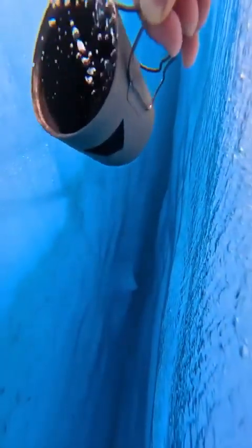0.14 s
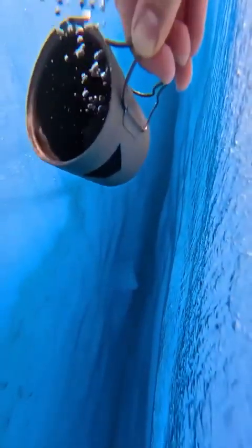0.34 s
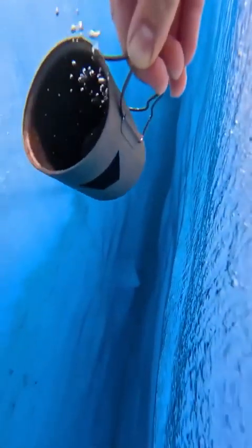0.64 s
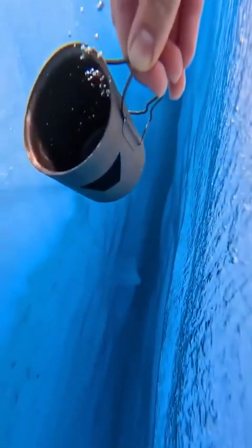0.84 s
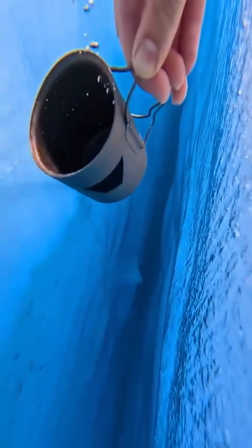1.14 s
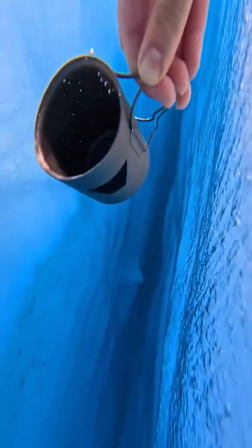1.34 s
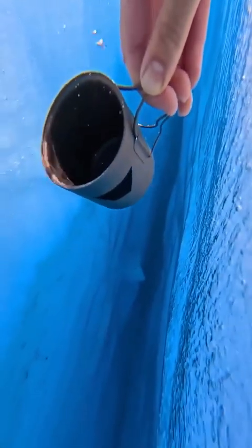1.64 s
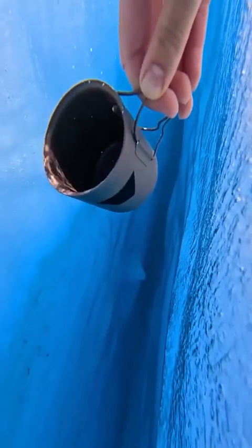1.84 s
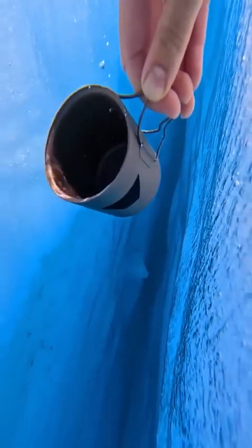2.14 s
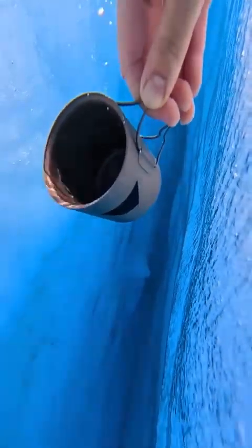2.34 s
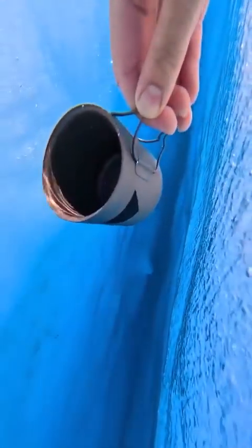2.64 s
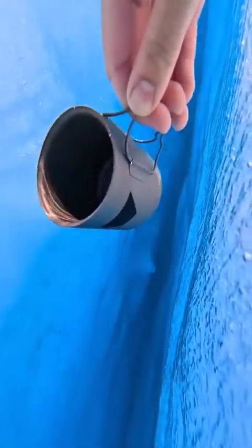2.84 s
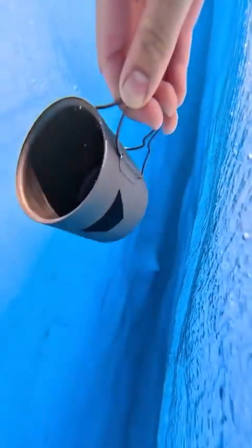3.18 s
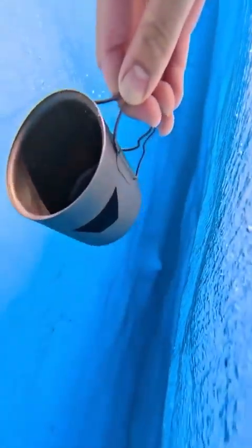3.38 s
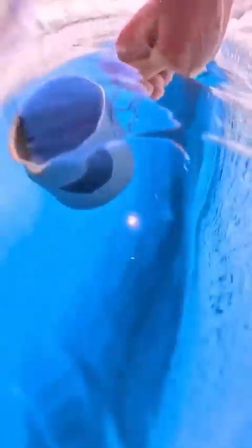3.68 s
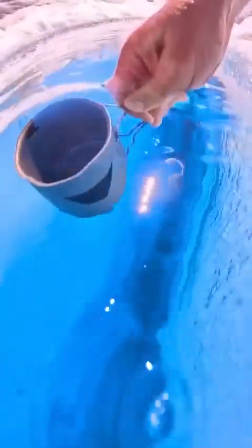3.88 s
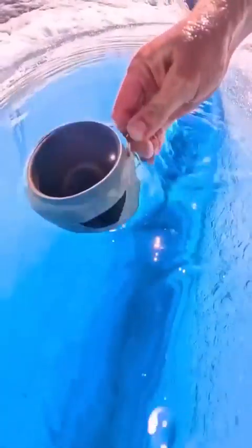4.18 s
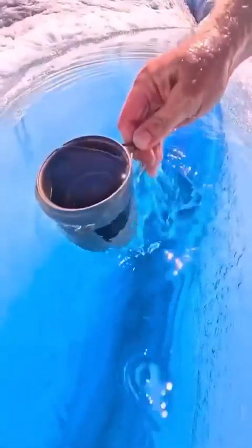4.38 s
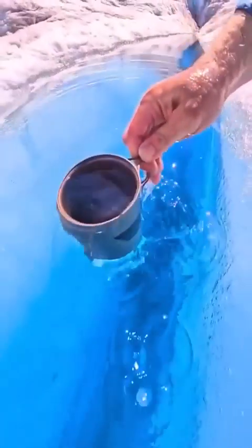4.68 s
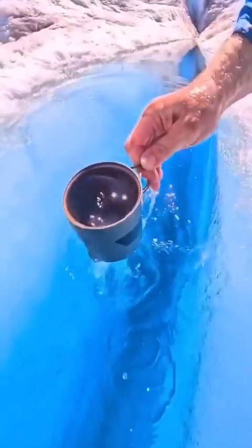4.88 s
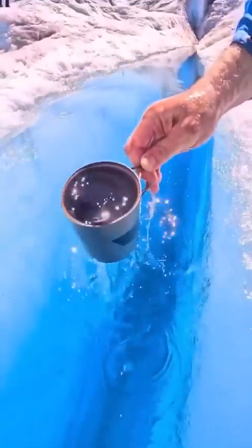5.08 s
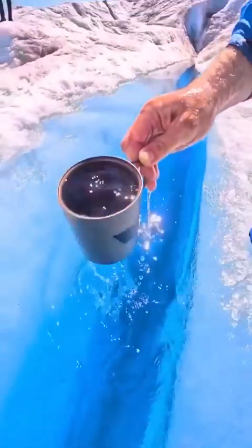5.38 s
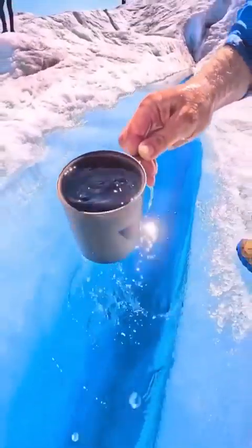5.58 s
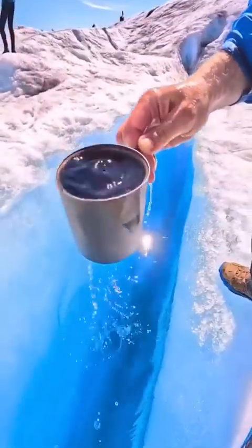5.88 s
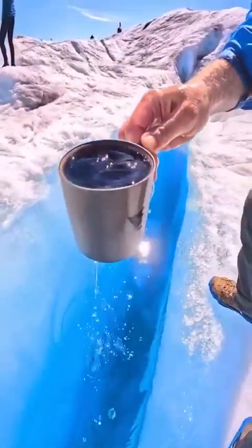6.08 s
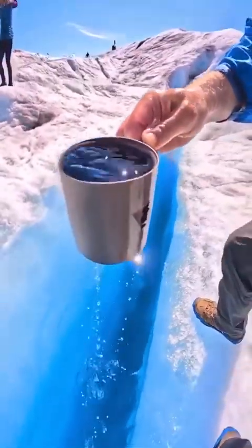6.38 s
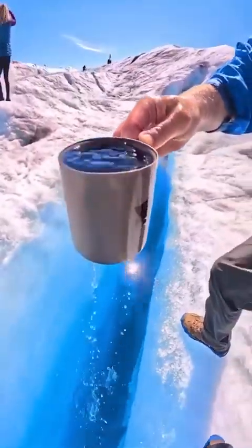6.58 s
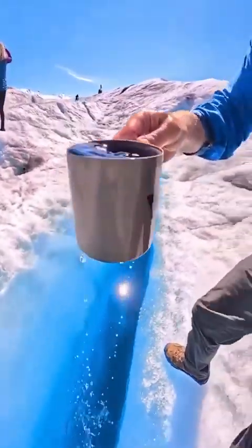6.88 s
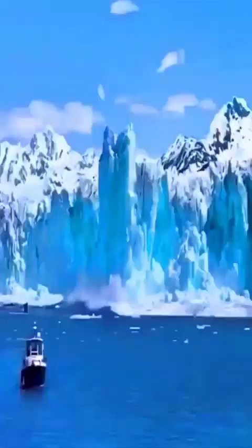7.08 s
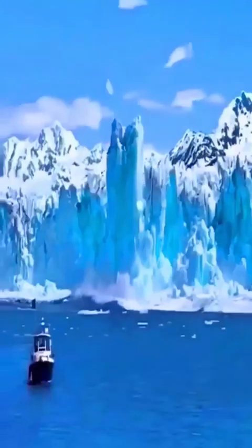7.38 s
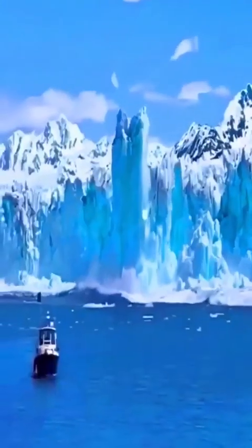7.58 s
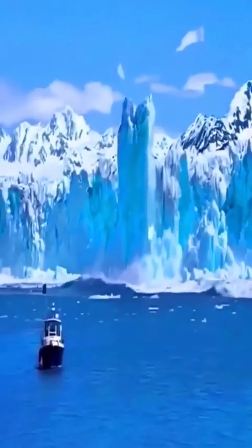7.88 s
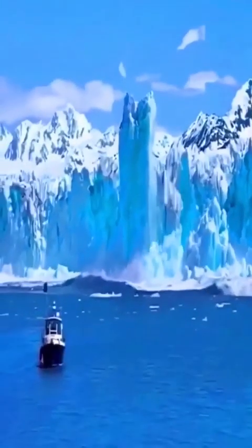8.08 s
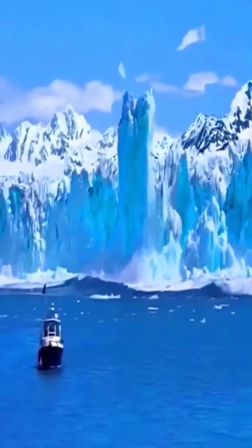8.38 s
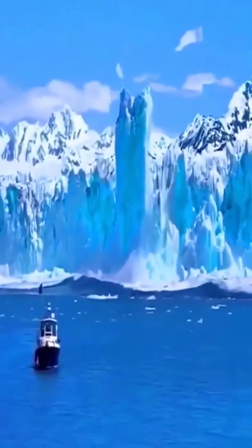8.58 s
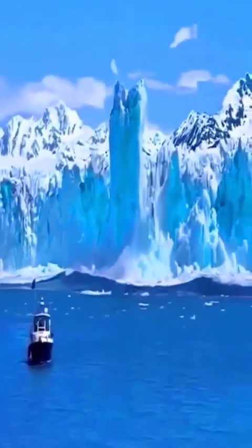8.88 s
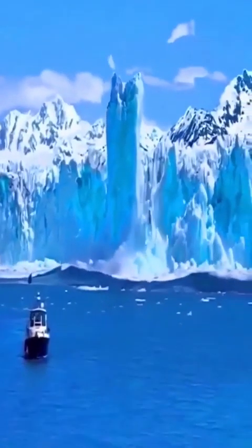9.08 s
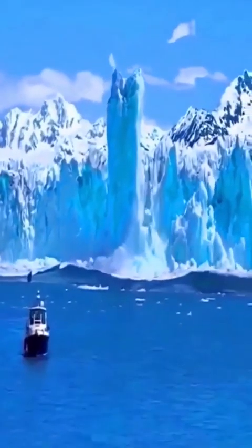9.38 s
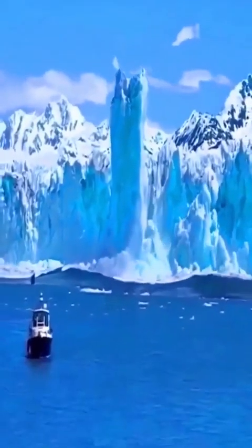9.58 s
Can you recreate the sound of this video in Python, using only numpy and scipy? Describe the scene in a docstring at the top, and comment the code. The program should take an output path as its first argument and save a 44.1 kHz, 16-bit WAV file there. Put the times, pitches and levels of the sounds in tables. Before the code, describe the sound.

A submerged microphone catches rapid, rounded gulps of air leaving a mug in a meltwater channel, with gurgling clusters and small fizzy snaps around them. After they dwindle, the sound opens into clear air, much quieter, with nearby drops plinking, ticking and chirping upwards as water drains off. It then changes to a wide, faraway ice fall, its uneven rumble and spray swelling faintly over the sea.

```python
"""A metal mug is sunk in a meltwater channel, close to a submerged microphone that hears the treble muffled.
First its air glugs out: damped, rising tones for bubbles, over stirred-water noise and bubble swarms.
Then the microphone surfaces: run-off from the lifted mug and hand plinks, chirps and spatters nearby,
made of short rising tones and noise ticks over the coloured noise of the channel.
Last, a distant glacier front sheds ice into the sea: coloured noise swells as thuds, rumble and spray."""
import sys
import numpy as np
from scipy import signal
from scipy.fft import rfft, irfft
from scipy.io import wavfile
from scipy.ndimage import uniform_filter1d, minimum_filter1d

SR = 44100
rng = np.random.default_rng(int(sys.argv[2]) if len(sys.argv) > 2 else 0)


def dump(signal):
    """Clip the signal to [-1, 1] and save it as 16-bit WAV at the path in sys.argv[1]."""
    limited = np.clip(np.atleast_2d(signal).T, -1, 1)
    pcm = np.round(limited * 32767).astype(np.int16)
    wavfile.write(sys.argv[1], SR, pcm)


N = 429093

# the microphone surfaces; the ice front takes over; time constant of both soft changes
SURFACE_S, CALVING_S, CHANGE_S = 4.43, 7.1, 0.15
PINCH_CYCLES = 0.66  # time constant, in cycles, of a bubble pinching off and reaching full swing
# a second bubble born beside the first: level, spread of pitch either way, longest delay
TWIN_DB, TWIN_OCTAVES, TWIN_S = -9, .45, .011


def undb(db):
    """Decibels to gain."""
    return 10 ** (np.asarray(db) / 20)


def curve(rows):
    """Gain along (start_s, level_db) rows, fading to silence after the last."""
    start_s, level_db = np.transpose(rows)
    t = np.arange(N) / SR
    fade = np.exp(-np.maximum(t - start_s[-1], 0) / 0.06)
    return undb(np.interp(t, start_s, level_db)) * fade


def after(s):
    """Gain that opens softly around a time."""
    return .5 + .5 * np.tanh((np.arange(N) / SR - s) / CHANGE_S)


def swells(times, levels_db, rise_s):
    """Stereo gain curve: each event swells within rise_s and dies away."""
    out = np.zeros((2, N))
    age = np.arange(SR // 3) / SR / rise_s
    for s, db in zip(times, levels_db):
        add(out, s, undb(db) * age * np.exp(1 - age), pan=0)
    return out


def surge(shape):
    """Gain that climbs from rest to a peak and ebbs more slowly."""
    peak_s, peak_db, rise, fall, rest_db = shape
    t = np.arange(N) / SR
    level_db = peak_db - rise * np.maximum(peak_s - t, 0) - fall * np.maximum(t - peak_s, 0)
    return np.hypot(undb(level_db), undb(rest_db))


def walk(rate):
    """Slow random wander with a spread near 1, through `rate` random points a second."""
    knots = rng.standard_normal(2000)
    return np.interp(np.arange(N) / SR * rate, np.arange(len(knots)), knots)


def unit(x):
    """Scale to rms 1."""
    return x / np.sqrt(np.mean(x ** 2))


def noise(side_db):
    """Stereo white noise; side_db sets its width."""
    mid, side = rng.standard_normal((2, N))
    return unit(mid + undb(side_db) * np.array([side, -side]))


def colour(x, points, size=8192):
    """Causal minimum-phase filter through (pitch_hz, level_db) points; the result has rms 1."""
    hz, db = np.transpose(points)
    bins_hz = np.arange(size // 2 + 1) * SR / size
    gain = undb(np.interp(np.log(bins_hz + 1), np.log(hz), db))
    # folding the cepstrum onto positive time makes the filter causal
    cepstrum = irfft(np.log(gain), size)
    cepstrum[1:size // 2] *= 2
    cepstrum[size // 2 + 1:] = 0
    response = irfft(np.exp(rfft(cepstrum)), size)
    return unit(signal.oaconvolve(x, response[None], axes=1)[:, :N])


def add(out, s, sound, pan):
    """Mix a sound in at a time and a left-right place."""
    start = int(np.clip(s * SR, 0, out.shape[1]))
    part = sound[:out.shape[1] - start]
    out[:, start:start + len(part)] += np.outer([1 + pan, 1 - pan], part)


def walls(x, t60, wet_db):
    """Short dense echoes between the ice walls, different in each channel."""
    t = np.arange(SR // 4) / SR
    tail = rng.standard_normal((2, len(t))) * np.exp(-np.log(1000) * t / t60) * (t > .002)
    tail /= np.sqrt(np.sum(tail ** 2, axis=1, keepdims=True))
    return x + undb(wet_db) * signal.oaconvolve(x, tail, axes=1)[:, :N]


def burst(fast_s, slow_s, slow_db):
    """Noise with a sharp front and a weaker, slower tail."""
    t = np.arange(SR // 12) / SR
    return rng.standard_normal(len(t)) * (np.exp(-t / fast_s) + undb(slow_db) * np.exp(-t / slow_s))


def bubble(hz, cycles, rise):
    """A pulsating air bubble: a damped tone that climbs as it nears the surface."""
    cycles = max(cycles, 1)
    age = np.arange(int(7 * cycles / hz * SR)) * hz / SR / cycles  # in ring times
    pitch = hz * (1 + rise * 2 * np.tanh(age / 2))
    onset = 1 - np.exp(-age * cycles / PINCH_CYCLES)
    return np.sin(2 * np.pi * np.cumsum(pitch) / SR) * np.exp(-age) * onset


def plink(hz, ring_s, octaves_per_s):
    """A bubble just under the surface: it starts at once, climbs up to an octave and bursts."""
    ring_s = max(ring_s, .001)
    t = np.arange(SR // 12) / SR
    pitch = hz * 2 ** np.minimum(octaves_per_s * t, 1)
    envelope = np.exp(-(t / ring_s) ** 2) * (1 - np.exp(-t * hz / 0.1))
    return np.sin(2 * np.pi * np.cumsum(pitch) / SR) * envelope


def twin(s, hz, db):
    """Time, pitch and level of a weaker bubble that forms beside another and beats with it."""
    late, size = rng.random(2)
    return s + TWIN_S * late, hz * 2 ** (TWIN_OCTAVES * (2 * size - 1)), db + TWIN_DB


def swarm(span, low_hz, high_hz, cycles, rise, spread_db, width, count):
    """Bubbles of random size, strength and place, scattered over a span of time."""
    out = np.zeros((2, N))
    start, end = span
    for when, size, strength, ring, climb, place in rng.random((count, 6)):
        hz = low_hz * (high_hz / low_hz) ** size
        tone = bubble(hz, cycles * (.5 + ring), 2 * rise * climb)
        level = hz * undb(spread_db * strength ** 2)
        add(out, start + when * (end - start), tone * level, width * (2 * place - 1))
    return out


def stir(bubbles, span, points):
    """Colour a swarm and give it rms 1 while it sounds."""
    return colour(bubbles, points) * np.sqrt((span[1] - span[0]) * SR / N)


# deep thuds of the distant ice fall: start_s, level_db
THUD_LEVEL = [(7.3, -53), (8.01, -55), (8.05, -42), (8.36, -32), (8.6, -42), (9.75, -50)]
# spectrum of the thuds: pitch_hz, relative level_db
THUD_SPECTRUM = [(20, 4.5), (55, 15), (85, 5), (160, -44)]
# rumble of the distant ice fall: start_s, level_db
RUMBLE_LEVEL = [(7.2, -57), (7.76, -54), (7.92, -42), (8.14, -38), (8.45, -31), (8.85, -31), (9.75, -39.5)]
# spectrum of the rumble: pitch_hz, relative level_db
RUMBLE_SPECTRUM = [(50, -16), (110, -4.5), (240, -4.5), (450, -11), (800, -29.5), (2000, -44.5)]
# spray thrown up by the ice: start_s, level_db
SPRAY_LEVEL = [(7.12, -39.5), (7.25, -49), (7.65, -44), (7.69, -41.5), (7.85, -36), (7.99, -38.5),
               (8.04, -35), (8.5, -33.5), (9.75, -37)]
# spectrum of the spray: pitch_hz, relative level_db
SPRAY_SPECTRUM = [(200, -4), (600, 0.5), (1150, 0), (1900, -7.5), (4000, -10), (6900, -14.5), (7800, -22.5),
                  (12500, -20.5), (15500, -50)]
# blocks crumbling off the ice front: start_s, level_db
CRUMBLING_BLOCKS = [(7.8, -37.5), (8.04, -42)]


def calving():
    """Far ice crumbles and pours into the sea: thuds and an uneven rumble under a wide hiss of spray."""
    thud = colour(noise(side_db=-45), THUD_SPECTRUM) * curve(THUD_LEVEL)
    rumble = colour(noise(side_db=-32), RUMBLE_SPECTRUM) * undb(1.3 * walk(12)) * curve(RUMBLE_LEVEL)
    spray = colour(noise(side_db=-3.0), SPRAY_SPECTRUM) * undb(1.4 * walk(21)) * curve(SPRAY_LEVEL)
    grit = colour(noise(side_db=-10), [(150, -33), (750, 2.5), (1500, -12), (12000, -33)])
    crumble = grit * undb(3.6 * walk(90)) * swells(*np.transpose(CRUMBLING_BLOCKS), rise_s=0.048)
    return (thud + rumble + spray) * after(CALVING_S) + crumble


# swell of the channel's murmur: peak_s, peak_db, rise_db_per_s, fall_db_per_s, rest_db
MURMUR_SWELL = (5.5, -39, 15, 5, -64)
# spectrum of the murmur: pitch_hz, relative level_db
MURMUR_SPECTRUM = [(20, 1), (120, 4.5), (250, 4), (370, -6), (490, -1.5), (1000, -2.5), (3000, -80.5),
                   (12000, -34.5)]


def channel_murmur():
    """The channel murmurs above water: coloured noise that swells and ebbs until the ice front takes over."""
    stream = colour(noise(side_db=-17.5), MURMUR_SPECTRUM) * surge(MURMUR_SWELL)
    return stream * after(SURFACE_S) * (1 - after(CALVING_S))


# how hard the water is stirred while the microphone is under: start_s, level_db
STIRRING = [(0.12, -20), (1.34, -13), (2.25, -15.5), (2.95, -19), (3.69, -29.5), (4.2, -27), (4.46, -40)]
# spectrum of the stirred water: pitch_hz, relative level_db
CHURN_SPECTRUM = [(20, -9), (50, -6.5), (80, -0.5), (125, -1.5), (250, -11), (400, -19), (800, -44.5),
                  (2000, -52.5), (4000, -68)]
BURBLE_DB, WASH_DB = 1, -1  # against the churn


def churning():
    """Stirred water rumbles: a swarm of low bubbles burbles through a wash of coloured noise."""
    span = 0, STIRRING[-1][0]
    bubbles = swarm(span, 65.19, 448.8, cycles=7, rise=.09, spread_db=7.5, width=0.25, count=300)
    burble = undb(BURBLE_DB) * stir(bubbles, span, CHURN_SPECTRUM)
    wash = undb(WASH_DB) * colour(noise(side_db=-7.0), CHURN_SPECTRUM)
    return (burble + wash) * curve(STIRRING)


# level of the small bubbles under water: start_s, level_db
SMALL_BUBBLES = [(0.03, -24.5), (0.21, -39), (0.84, -31.5), (1.2, -40.5), (1.42, -32), (3.37, -41.5),
                 (3.65, -49), (4.06, -45), (4.45, -57)]
# spectrum of the small bubbles: pitch_hz, relative level_db
FIZZ_SPECTRUM = [(150, -45), (330, 4.5), (600, 4), (1300, -11.5), (2000, -22), (3000, -31.5), (4500, -33),
                 (8000, -49)]
CLUSTER_DB, FROTH_DB = 3, -7  # clusters against the bubbling, froth against the clusters
FLURRY_DB, FLURRY_S = -21.5, 0.016  # tiny bubbles after each snap: relative level, time to swell


def fizzing():
    """Small bubbles swarm in clusters and froth, and break from every gulp and snap."""
    span = 0, STIRRING[-1][0]
    fizz = swarm(span, 330, 2800, cycles=7, rise=.03, spread_db=10, width=.25, count=2000)
    high = stir(walls(fizz, t60=0.24, wet_db=-9.0), span, FIZZ_SPECTRUM)
    # a froth too fine to hear singly wraps the clusters
    froth = undb(FROTH_DB) * colour(noise(side_db=-11.0), FIZZ_SPECTRUM)
    clusters = undb(CLUSTER_DB + 1.9 * walk(17)) * (high + froth) * curve(SMALL_BUBBLES)
    # every gulp breaks up into more bubbles, every snap into a flurry of tiny ones
    gulp_s, _, gulp_db, _ = np.transpose(AIR_GULPS)
    shards = undb(-37) * high * swells(gulp_s, gulp_db, rise_s=0.0083)
    snap_s, snap_db, _ = np.transpose(FIZZ_SNAPS)
    tiny = stir(fizz, span, [(500, -6.0), (1500, 4), (3000, -7.5), (5000, -26.5)])
    return clusters + shards + undb(FLURRY_DB) * tiny * swells(snap_s, snap_db, FLURRY_S)


def spatter(span, count):
    """Tiny droplets tick on the water: many faint, a few strong."""
    out = np.zeros((2, N))
    start, end = span
    for when, strength, place in rng.random((count, 3)):
        tick = undb(19 * strength ** 5) * burst(.001, .008, slow_db=-15)
        add(out, start + when * (end - start), tick, place - .5)
    return out


# how much water runs off the mug: start_s, level_db
RUNOFF_LEVEL = [(4.4, -56), (4.68, -54.5), (5.1, -42), (5.21, -47), (5.29, -41.5), (5.6, -40.5),
                (6.09, -45.5), (6.93, -46.5), (7.1, -58)]
# spectrum of the falling droplets: pitch_hz, relative level_db
PATTER_SPECTRUM = [(500, -64), (850, 16.5), (1200, 0), (2500, 0.5), (3800, -6), (5500, -5), (8000, -12),
                   (13000, -15.5), (16000, -29)]
SPLASH_DB, SPLASH_S = -40.5, 0.017  # splash relative to the drop; time the splash takes to swell
SPURT_DB = 2.8  # how unevenly the droplets fall
BABBLE_DB = -3.5  # bubbles jostling where the run-off lands, relative to the run-off


def patter():
    """Droplets chirp and tick, bubbles babble and fine spray hisses round the run-off."""
    span = SURFACE_S, CALVING_S
    chirps = swarm(span, 770, 2730, cycles=5.9, rise=0.246, spread_db=10.5, width=0.1, count=1000)
    droplets = unit(chirps) + undb(6.5) * unit(spatter(span, count=420))
    drops = walls(undb(3.5) * stir(droplets, span, PATTER_SPECTRUM), t60=0.023, wet_db=-4)
    jostle = swarm(span, 724, 1700, cycles=9.4, rise=0.0914, spread_db=19.0, width=0.066, count=520)
    babble = unit(jostle) * undb(3.3 * walk(9))
    mist = undb(-0.5) * colour(noise(side_db=-9.0), PATTER_SPECTRUM)
    # every heavy drop throws up a splash of its own, the longer-ringing ones more
    drip_s, _, drip_db, ring_s = np.transpose(HEAVY_DRIPS)
    splash_db = drip_db + 10 * np.log10(np.abs(ring_s) / .012)
    flow = curve(RUNOFF_LEVEL) + undb(SPLASH_DB) * swells(drip_s, splash_db, SPLASH_S)
    trickle = (drops * undb(SPURT_DB * walk(14)) + undb(BABBLE_DB) * babble + mist) * flow
    return trickle * after(SURFACE_S) * (1 - after(CALVING_S))


# the heaviest falling drops, each ringing a clear plink: start_s, pitch_hz, relative level_db, ring_s
HEAVY_DRIPS = [(4.641, 970, -35, 0.0067), (4.913, 905, -20.5, 0.01), (4.974, 970, -22, 0.005),
               (5.027, 872, -21, 0.016), (5.06, 715, -24.5, 0.023), (5.2385, 745, -9.5, 0.028),
               (5.3125, 810, -20.5, 0.021), (5.346, 860, -24, 0.018), (5.371, 1315, -13, 0.013),
               (5.389, 1335, -18, 0.024), (5.4477, 739, -10, 0.022), (5.558, 865, -12.5, 0.015),
               (5.63, 837, -16.5, 0.0074), (5.71, 900, -24, 0.01), (5.797, 960, -18, 0.0063),
               (5.893, 833, -18.5, 0.012), (6.376, 810, -17.5, 0.015), (6.401, 753, -23, 0.022),
               (6.602, 877, -18, 0.01), (6.624, 927, -14, 0.0098), (6.812, 926, -23.5, 0.0085),
               (6.868, 850, -18.5, 0.012), (6.894, 845, -17, 0.0053), (7.008, 1000, -29.5, 0.0091),
               (7.157, 700, -38, 0.012)]
# small bubbles that chirp upwards as they reach the surface: start_s, starting pitch_hz, level_db
RISING_CHIRPS = [(4.583, 2250, -29.5), (4.74, 1580, -25), (4.936, 2300, -24), (4.951, 1470, -24.5),
                 (5.049, 1630, -26.5), (5.116, 1670, -28), (5.431, 2210, -24), (5.798, 1710, -19),
                 (5.847, 1370, -27), (5.9548, 2420, -23.5), (6.01, 1640, -17), (6.059, 1890, -26),
                 (6.107, 1640, -24), (6.1266, 2380, -15), (6.151, 2480, -25), (6.272, 2200, -26),
                 (6.517, 2200, -22), (6.571, 2520, -28), (6.632, 1480, -22.5), (6.666, 3120, -25.5),
                 (6.733, 2390, -27.5), (6.847, 1940, -23), (6.8515, 2210, -21)]
# drops slapping the surface and leaving a pinhead bubble: start_s, level_db, pitch_hz
SURFACE_SLAPS = [(4.775, -34.5, 4830), (4.999, -26, 4470), (5.049, -32, 5700), (5.265, -23, 3320),
                 (5.508, -32, 4200), (5.798, -32, 4130), (5.959, -29, 4360), (6.201, -28.5, 4120),
                 (6.547, -29.5, 4640), (6.993, -35, 4900), (7.11, -41, 3670)]
# drops shattering into fine spray: start_s, level_db
FINE_SPRITZES = [(4.595, -52.5), (4.638, -52), (5.228, -44), (5.402, -40), (6.5, -44), (6.708, -43),
                 (6.745, -44.5), (6.928, -56)]
# spectrum of the fine spray: pitch_hz, relative level_db
SPRITZ_SPECTRUM = [(2000, -34), (6000, 4), (13000, 0), (16000, -20)]
CHIRP_CYCLES, CHIRP_TICK_DB = 7, -10  # ring in starting cycles; tick of the impact against the chirp
SLAP_DB = 6  # tick of the slap against its bubble


def dripping():
    """Drops tick on the surface; heavy ones plink, small ones chirp upwards, others just slap or shatter."""
    out = np.zeros((2, N))
    crisp = signal.butter(1, [2000, 6500], "bandpass", fs=SR, output="sos")

    def tick():
        """The click of a drop's impact: a crisp noise burst."""
        return signal.sosfilt(crisp, burst(.001, .007, slow_db=-13))

    for s, hz, db, ring_s in HEAVY_DRIPS:
        pan = rng.normal(0, .06)
        drop = plink(hz, ring_s, octaves_per_s=2.5) + undb(-13.5) * tick()
        add(out, s, undb(db - 2.0) * drop, pan)
        # a weaker, shorter bubble follows
        late_s, late_hz, late_db = twin(s + ring_s, hz * 1.195, db - 6.5)
        add(out, late_s, undb(late_db) * plink(late_hz, ring_s / 2, octaves_per_s=11), pan)
    for s, hz, db in RISING_CHIRPS:
        pan = rng.normal(0, 0.024)
        add(out, s, undb(db + CHIRP_TICK_DB) * tick(), pan)
        for chirp_s, chirp_hz, chirp_db in (s, hz, db), twin(s, hz, db):
            chirp = plink(chirp_hz, CHIRP_CYCLES / chirp_hz, octaves_per_s=82)
            add(out, chirp_s, undb(chirp_db) * chirp, pan)
    for s, db, hz in SURFACE_SLAPS:
        slap = plink(hz, ring_s=0.0048, octaves_per_s=28) + undb(SLAP_DB) * tick()
        add(out, s, undb(db) * slap, rng.normal(0, 0.17))
    # such small sources radiate no bass
    out = signal.sosfilt(signal.butter(4, 560, "highpass", fs=SR, output="sos"), out)
    shatter = swells(*np.transpose(FINE_SPRITZES), rise_s=0.0088)
    spritz = colour(noise(side_db=-32), SPRITZ_SPECTRUM) * shatter
    return walls(out, t60=.25, wet_db=-14) + spritz


PLOP_CYCLES, PLOP_RING_SLOPE = 10.5, 0.72  # ring cycles at 1 kHz, growing with this power of the pitch
SHED_DB, SHED_S, SHED_OCTAVES = -25, .06, 2  # lesser bubbles: level before size, longest delay, most octaves up
KICK_DB = -8.5  # jolt of a bubble's neck closing, relative to the plop's level


def plop(out, s, hz, db, count):
    """A bubble tears off with a jolt and a rough start, splits and sheds a few lesser ones."""
    pan = rng.normal(0, 0.13)
    cycles = PLOP_CYCLES * (hz / 1000) ** PLOP_RING_SLOPE
    add(out, s, undb(db - 0.95) * bubble(hz, cycles, rise=0.035), pan)
    add(out, s, undb(db + KICK_DB) * bubble(hz, cycles=1.1, rise=0), pan)
    band = signal.butter(2, [.5 * hz, np.sqrt(2) * hz], "bandpass", fs=SR, output="sos")
    tear = signal.sosfilt(band, burst(.001, .03, slow_db=-6.5))
    # the root makes up for the narrower band of a lower pitch
    add(out, s, undb(db - 32) * np.sqrt(SR / hz) * tear, pan)
    twin_s, twin_hz, twin_db = twin(s, hz, db)
    add(out, twin_s, undb(twin_db) * bubble(twin_hz, cycles, rise=0), pan)
    for late, size in rng.random((count, 2)):
        higher = 2 ** (SHED_OCTAVES * size)
        shed = bubble(hz * higher, cycles, rise=0.057) / higher
        add(out, s + SHED_S * late, undb(db + SHED_DB) * shed, pan)


def gurgle(out, s, length_s, hz, db, count):
    """Bubbles of similar size tumble out so close together that they merge."""
    knot = np.zeros((2, SR // 4))
    for when, size in rng.random((count, 2)):
        higher = 2 ** (.55 * (2 * size - 1))
        add(knot, when * length_s, bubble(hz * higher, cycles=10.5, rise=.08) / higher, pan=0)
    mono = knot[0]
    level = np.sqrt(abs(length_s) * SR / np.sum(mono ** 2))  # rms 1 if spread over its length
    add(out, s, undb(db - 3.0) * mono * level, rng.normal(0, .2))


# biggest air pockets leaving the mug: start_s, pitch_hz, level_db, rise (initial, fraction per ring time)
AIR_GULPS = [(0.098, 309, -6, 0.0094), (0.633, 182.7, -5.5, 0.12), (0.832, 160, -1.5, 0.11),
             (1.059, 200, -3.5, 0.057), (1.127, 247, 1, 0.088), (1.218, 331, -7.5, 0.014),
             (1.338, 113.2, 1, 0.12), (1.438, 218.7, -0.5, 0.053), (1.8, 147, -3, 0.04),
             (1.989, 281, -5, 0.024), (2.121, 157.5, -1.5, 0.079), (2.344, 272, -8.5, 0.027),
             (2.59, 193, -6, 0.024), (2.697, 144, -3, 0.24), (2.799, 102, -4.5, 0.034),
             (2.915, 104.6, -4.5, 0.84), (3.085, 273, -9.5, 0.013)]
# the clearest bubbles pinching off under water: start_s, pitch_hz, relative level_db
CLEAR_PLOPS = [(0.002, 790, -14.5), (0.037, 715, -14), (0.058, 940, -12.5), (0.093, 838, -12),
               (0.292, 425, -7.5), (0.396, 438, -3), (0.422, 521, -11.5), (0.527, 773, -13.5),
               (0.581, 677, -19), (0.65, 772, -16), (0.885, 643, -13.5), (1.201, 576, -10),
               (1.382, 946, -18), (1.518, 1184, -10.5), (1.522, 366, -6.5), (1.601, 463, -10),
               (1.688, 377, -7), (1.732, 1440, -15), (1.888, 1496, -25.5), (1.945, 656, -20),
               (1.2, 1700, -23), (2.261, 544, -14), (2.304, 553, -12), (2.519, 358, -8.5),
               (2.706, 1083, -11.5), (2.986, 532, -16.5), (3.349, 683, -23), (3.467, 630, -20),
               (3.807, 763, -23), (3.896, 800, -31), (3.965, 582, -17.5), (3.995, 520, -14),
               (4.044, 1020, -35), (4.092, 535, -16), (4.125, 592, -18), (4.21, 1400, -32.5),
               (4.224, 960, -29), (4.272, 1410, -34.5)]
# knots of small bubbles tumbling out together: start_s, length_s, middle pitch_hz, relative level_db
BUBBLE_KNOTS = [(0.056, 0.021, 800, -18.5), (0.072, 0.049, 766, -33), (0.128, 0.024, 807, -24.5),
                (0.268, 0.047, 1130, -31), (0.419, 0.019, 1097, -31), (0.541, 0.029, 900, -28),
                (0.647, 0.017, 1024, -23), (0.681, 0.065, 974, -31), (0.902, 0.095, 1290, -37.5),
                (1.056, 0.04, 698, -23.5), (1.167, 0.055, 913, -31), (1.17, 0.05, 1760, -42),
                (1.28, 0.038, 880, -31), (1.37, 0.048, 1014, -34), (1.44, 0.086, 750, -29.5),
                (1.563, 0.035, 1295, -30.5), (1.633, 0.032, 1165, -30.5), (1.714, 0.058, 1276, -26.5),
                (1.767, 0.057, 743, -35), (2.098, 0.13, 2140, -40.5), (2.146, 0.04, 1257, -30.5),
                (2.321, 0.044, 760, -28.5), (2.49, 0.051, 1085, -27), (2.56, 0.052, 752, -30.5),
                (2.674, 0.028, 997, -29.5), (2.808, 0.06, 1407, -37), (2.83, 0.098, 2240, -49),
                (3.051, 0.057, 962, -38), (3.329, 0.034, 527, -20.5), (3.481, 0.048, 824, -31.5),
                (3.781, 0.04, 950, -38)]
# bubbles shattering into fizz under water: start_s, level_db, pitch_hz
FIZZ_SNAPS = [(0.034, -19, 2010), (0.059, -18, 2610), (0.387, -34.5, 2580), (0.792, -39, 3900),
              (0.836, -24, 2300), (0.885, -10.5, 1810), (0.982, -22, 1730), (1.077, -22, 1724),
              (1.2197, -19.5, 1640), (1.268, -19, 2700), (1.393, -26, 2580), (1.497, -29, 2950),
              (2.094, -32.5, 2620), (2.154, -24, 1514), (2.236, -26, 2570), (2.7477, -36.5, 3520),
              (2.838, -28.5, 2440), (3.109, -36, 2640), (4.346, -31.5, 1780)]
GULP_CYCLES = 6.5  # cycles of the starting pitch until a gulp has faded to 1/e
GULP_WIDE_HZ = 42  # left-right scatter is this over the pitch: bigger pockets spread wider
SNAP_CYCLES, SNAP_FIZZ_DB = 8.9, -27  # ring of a snap; its noise against its tone


def glugging():
    """Close by, air escapes from the sunken mug in deep gulps, plops, gurgles and fizzing snaps."""
    deep, small = np.zeros((2, N)), np.zeros((2, N))
    for s, hz, db, rise in AIR_GULPS:
        add(deep, s, undb(db) * bubble(hz, GULP_CYCLES, rise), rng.normal(0, GULP_WIDE_HZ / hz))
    for s, hz, db in CLEAR_PLOPS:
        plop(small, s, hz, db, count=4)
    for s, length_s, hz, db in BUBBLE_KNOTS:
        gurgle(small, s, length_s, hz, db, count=9)
    for s, db, hz in FIZZ_SNAPS:
        pan = rng.normal(0, .2)
        add(small, s, undb(db) * bubble(hz, SNAP_CYCLES, rise=0), pan)
        add(small, s, undb(db + SNAP_FIZZ_DB) * burst(0.038, 0.049, slow_db=-9.0), pan)
    return deep + walls(small, t60=0.31, wet_db=-17.5)


def scene():
    """Under water, above water, then the glacier front."""
    # water against the microphone muffles the treble
    muffle = signal.butter(4, 3900, fs=SR, output="sos")
    under_water = signal.sosfilt(muffle, churning() + fizzing() + glugging())
    above_water = channel_murmur() + patter() + dripping()
    return under_water + above_water + calving()


def record(dry):
    """A limiter eases down the highest peaks; a steep low-pass cuts the top."""
    size = SR // 200  # 5 ms
    peak = np.abs(dry).max(axis=0)
    lowest = minimum_filter1d(.95 / np.maximum(peak, .95), size)
    gain = uniform_filter1d(lowest, size)
    low_pass = signal.ellip(8, .2, 70, 15800, fs=SR, output="sos")
    return signal.sosfilt(low_pass, dry * gain)


dry = scene()
out = record(dry)
dump(out)
```